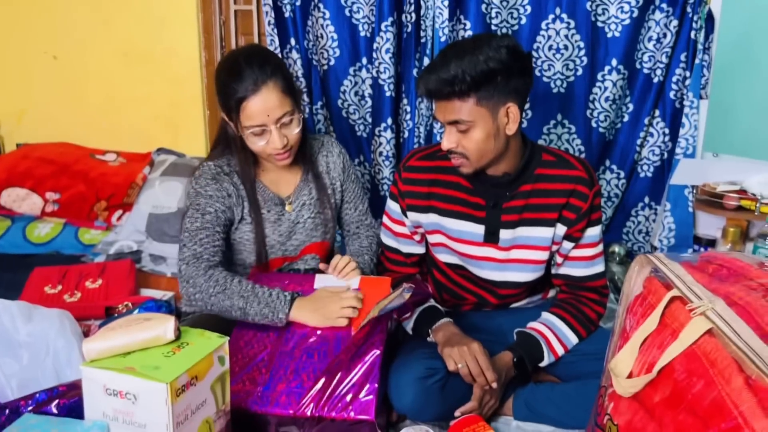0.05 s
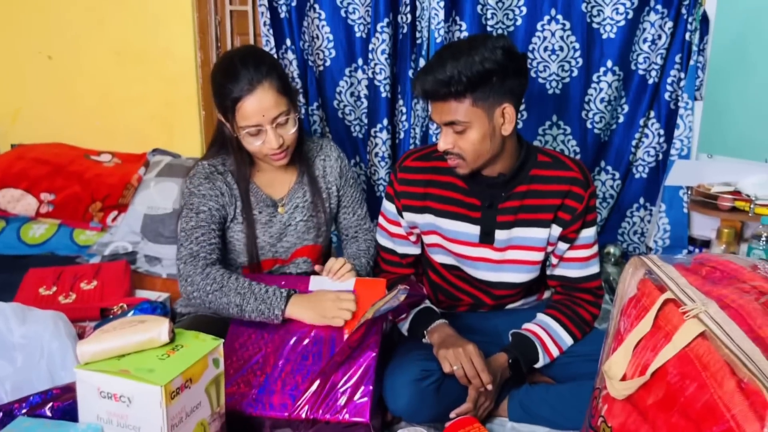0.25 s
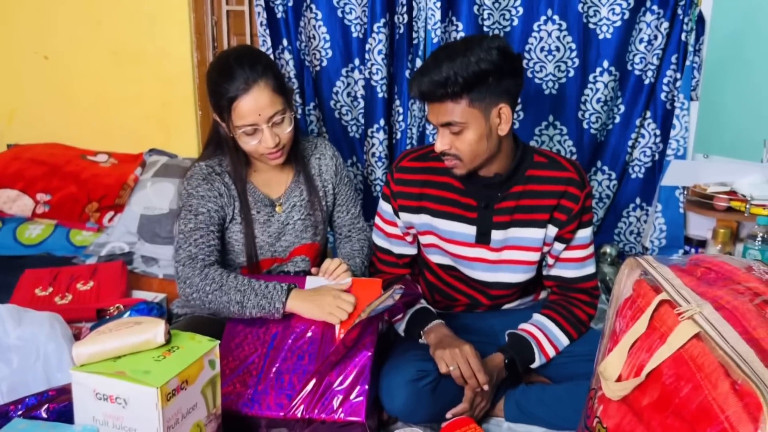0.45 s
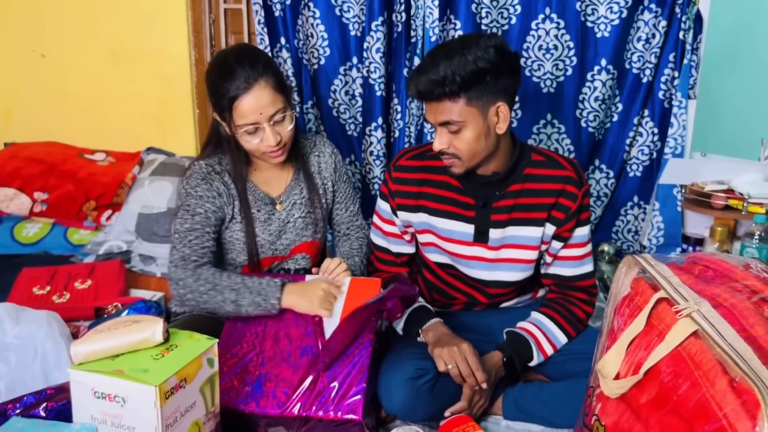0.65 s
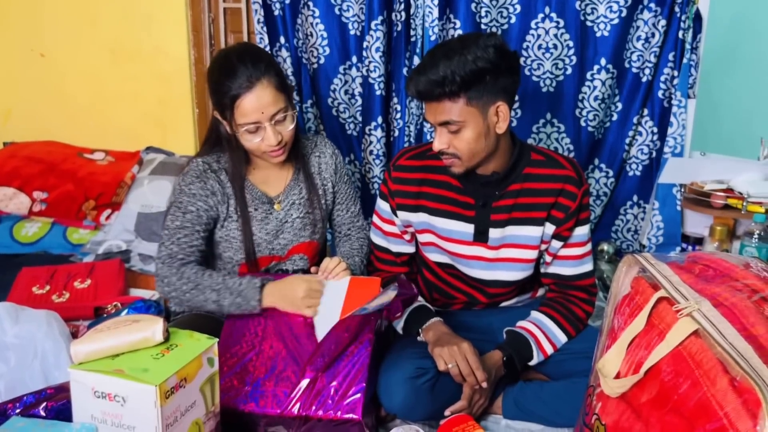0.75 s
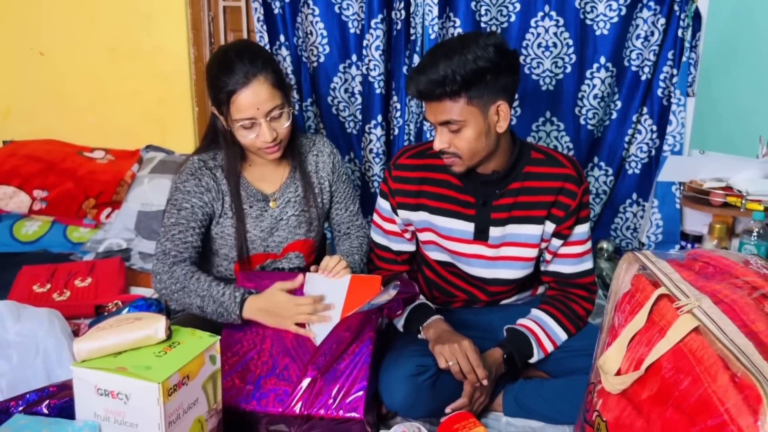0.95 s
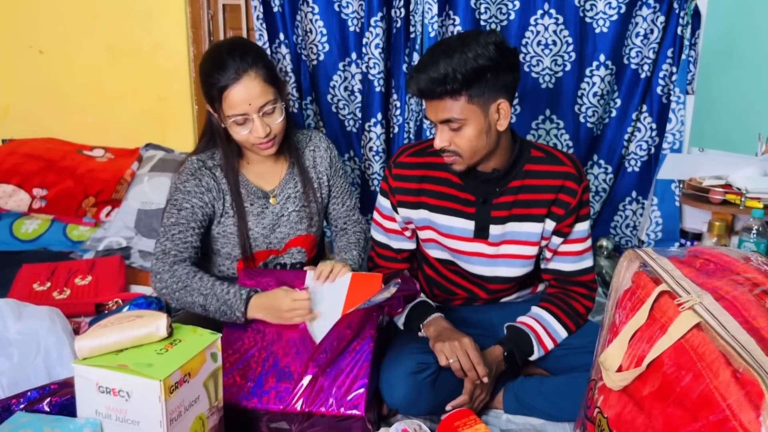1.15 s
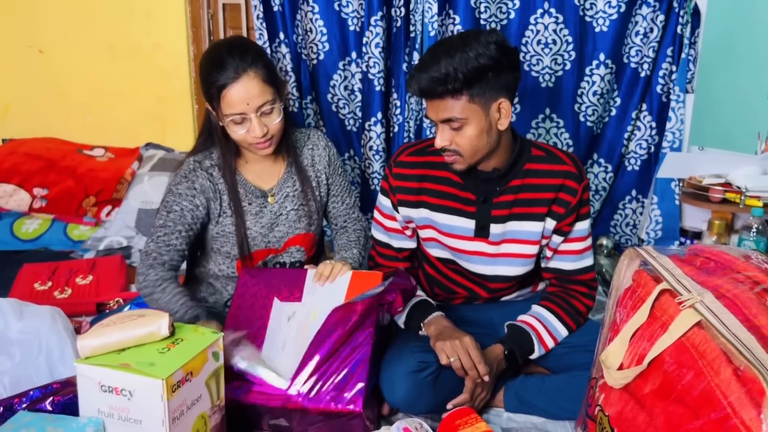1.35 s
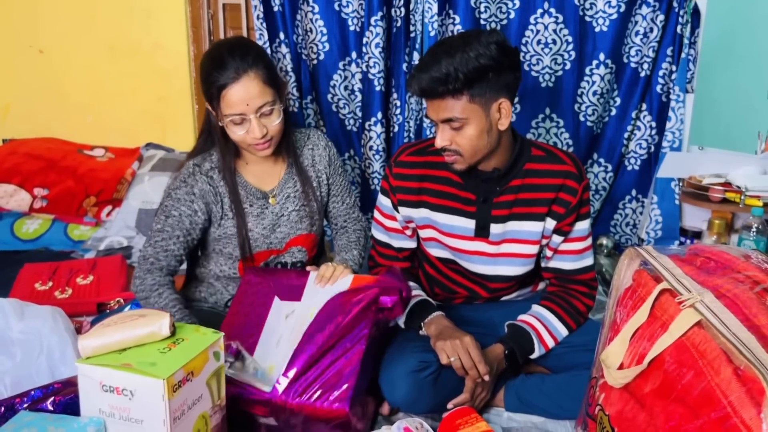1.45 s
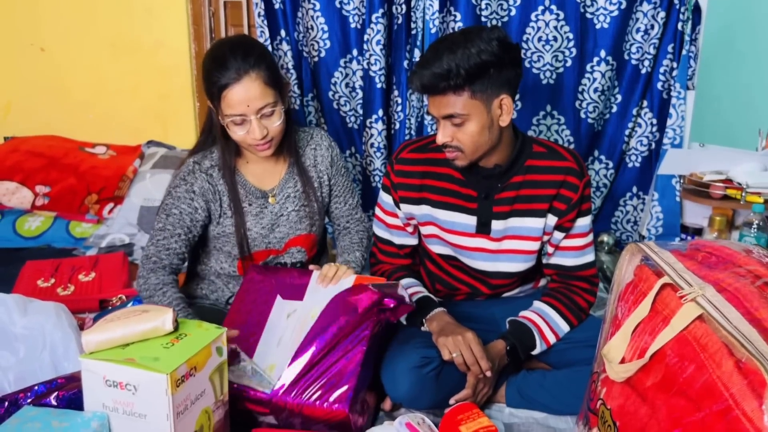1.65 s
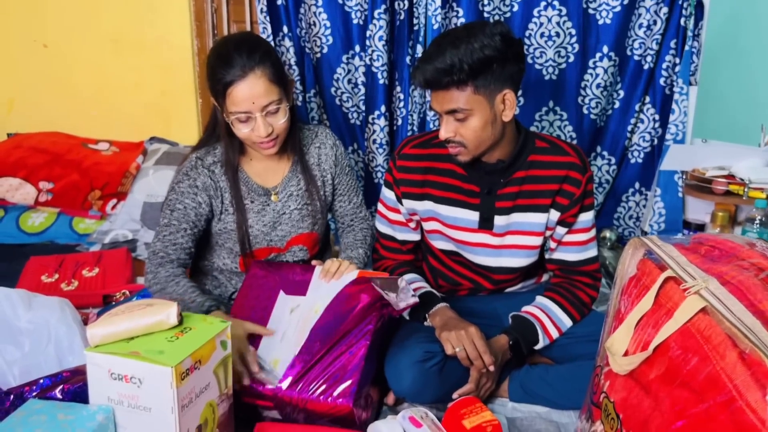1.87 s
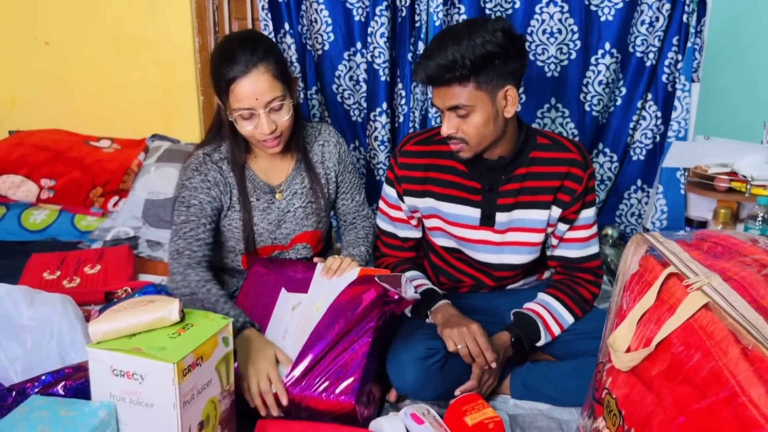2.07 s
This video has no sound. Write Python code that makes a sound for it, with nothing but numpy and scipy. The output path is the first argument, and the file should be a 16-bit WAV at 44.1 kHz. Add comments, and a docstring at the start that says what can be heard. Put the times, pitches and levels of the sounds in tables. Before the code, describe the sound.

Foil wrapping paper crinkles on a cardboard box nearby in a small, slightly echoing room. It starts faintly with a sliding hand, then grows, with a crisp snap and soft box knock at 0.6 seconds and another knock at 1 second. Around 1.25 seconds a taped flap rips loose briefly with sharp cracks, the loudest moment. Lighter crinkling follows, with a hand swishing over the foil near 1.9 seconds.

```python
"""Shiny foil paper crinkles and snaps as a cardboard box is unwrapped a step or two away in a small room.
Tiny creases flip, foil rubs on foil and larger folds buckle. A taped flap rips loose in one short
pull of rapid slips, ringing the taut sheet. A hand slides over the box, which knocks softly as its
walls flex. The room rings on behind every sound."""
import sys
import numpy as np
from scipy import signal
from scipy.fft import rfft, irfft
from scipy.io import wavfile
from scipy.ndimage import uniform_filter1d

SR = 44100
rng = np.random.default_rng(int(sys.argv[2]) if len(sys.argv) > 2 else 0)


def dump(signal):
    """Clip the signal to [-1, 1] and save it as 16-bit WAV at the path in sys.argv[1]."""
    limited = np.clip(np.atleast_2d(signal).T, -1, 1)
    pcm = np.round(limited * 32767).astype(np.int16)
    wavfile.write(sys.argv[1], SR, pcm)


N = 93051
TIME = np.arange(N) / SR

# how hard the foil is worked: (time [s], relative level [dB])
HANDLING = [(0, -62), (.05, -60), (.13, -50), (.22, -46), (.26, -52), (.29, -47), (.34, -49), (.565, -54.5),
            (.59, -44.5), (.638, -40), (.652, -37), (.79, -39.5), (.83, -39), (.93, -37.5), (.98, -47.5),
            (1.02, -42.5), (1.06, -35.5), (1.11, -35), (1.15, -38.5), (1.22, -29), (1.40, -30),
            (1.46, -36.5), (1.64, -45.5), (1.69, -37), (1.77, -36.5), (1.81, -41), (1.85, -39), (1.92, -34),
            (2.11, -34)]
# hand strokes over the package: (start [s], length [s], relative level [dB], tilt [dB/octave])
STROKES = [(0.032, 0.074, -37.5, -2.5), (0.115, 0.088, -44, -5.5), (1.668, 0.028, -43.5, 5.5),
           (1.842, 0.21, -43, 6)]


def from_db(db):
    """Decibels to gain."""
    return 10 ** (np.asarray(db) / 20)


def unit_rms(x):
    """Scale to RMS 1."""
    return x / np.sqrt(np.mean(x ** 2) + 1e-20)


def decay(age_s, t60_s):
    """Gain falling 60 dB in t60_s."""
    return np.exp(-np.log(1000) * age_s / t60_s)


def at_hz(points, hz):
    """Read a table along log frequency."""
    points_hz, values = np.transpose(points)
    return np.interp(np.log(np.maximum(hz, 1)), np.log(points_hz), values)


def colour(x, spectrum, db_per_octave=0, size=4096):
    """Minimum-phase filter of the given spectrum; white noise keeps its level."""
    hz = np.maximum(np.arange(size // 2 + 1) * SR / size, 10)
    gain = unit_rms(from_db(at_hz(spectrum, hz) + db_per_octave * np.log2(hz)))
    cepstrum = irfft(np.log(gain))
    cepstrum[1:size // 2] *= 2
    cepstrum[size // 2 + 1:] = 0
    return signal.fftconvolve(x, irfft(np.exp(rfft(cepstrum))))[:N]


def high_pass(x, hz):
    """Second-order low cut."""
    return signal.sosfilt(signal.butter(2, hz, "high", fs=SR, output="sos"), x + 1e-18)


def resonance(hz, width_hz):
    """Band-pass coefficients, peak gain 1."""
    r = np.exp(-np.pi * width_hz / SR)
    return (1 - r * r) / 2 * np.array([1, 0, -1]), [1, -2 * r * np.cos(2 * np.pi * hz / SR), r * r]


def ring(x, modes):
    """Each mode rings as a dying sine, neighbours in opposite sign."""
    out = 0
    for k, (hz, db, t60_s) in enumerate(modes):
        r, w = decay(1 / SR, t60_s), 2 * np.pi * hz / SR
        mode = signal.lfilter([0, np.sin(w)], [1, -2 * r * np.cos(w), r * r], x + 1e-18)
        out += (-1) ** k * from_db(db) * mode
    return out


def clicks(per_s, spread_db):
    """Random clicks, many small and a few larger; RMS 1."""
    sizes = from_db(spread_db * np.minimum(rng.exponential(1, N), np.pi)) * rng.choice([-1, 1], N)
    return unit_rms(sizes * (rng.random(N) < per_s / SR))


def burst(start_s, length_s):
    """Envelope of a buckling crease: sudden, soon over."""
    return (TIME > start_s) * np.exp(-((TIME - start_s) / length_s) ** 2)


def stroke(start_s, length_s, attack_s=0.01, release_s=0.015):
    """Envelope of a sliding hand: attack, hold, release."""
    age_s = TIME - start_s
    return np.clip(age_s / attack_s, 0, 1) * np.exp(-np.maximum(age_s - length_s, 0) / release_s)


def air():
    """Quiet room air: steady, mostly low noise."""
    # (frequency [Hz], relative density [dB])
    spectrum = [(40, -26), (105, 0), (300, -5), (700, -13), (2000, -21), (6000, -24), (16000, -30)]
    return from_db(-56) * colour(rng.standard_normal(N), spectrum)


def echoes(x, first_echo_s=0.0049):
    """Dense early echoes off near walls, then a longer diffuse tail."""
    # room decay: (frequency [Hz], t60 [s])
    decay_times = [(100, 0.84), (500, 0.38), (2000, 0.72), (5000, 0.7), (10000, 0.68), (16000, 0.6)]
    age_s, hz = TIME[:SR], np.arange(SR // 2 + 1)
    white, tail = rfft(rng.standard_normal(SR)), 0
    edges_hz = np.append(0, np.geomspace(250, SR / 2, 10))
    for low, high in zip(edges_hz, edges_hz[1:]):
        band = irfft(white * ((hz >= low) & (hz < high)), SR)
        tail += band * decay(age_s, at_hz(decay_times, (low + high) / 2))
    early = rng.standard_normal(SR) * decay(age_s, t60_s=0.24)
    onset = np.clip(age_s / first_echo_s - 1, 0, 1)
    response = from_db(-6) * unit_rms(tail * onset) + from_db(1) * unit_rms(early * onset)
    return signal.fftconvolve(x, response / np.sqrt(SR))[:N]


def wandering_echoes(x, spots=5, dwell_s=0.0017):
    """The sound wanders over the sheet, and each spot has its own echoes."""
    shares = rng.standard_normal((spots, N))
    for _ in range(2):
        shares = uniform_filter1d(shares, int(dwell_s * SR), axis=1)
    shares /= np.sqrt(np.sum(shares ** 2, axis=0))
    return sum(echoes(x * share) for share in shares)


def slides():
    """Skin and sleeve drag over the package: a smooth swish, dull on card, brighter on foil."""
    # swish: (frequency [Hz], relative density [dB])
    spectrum = [(60, -15), (120, -13.5), (300, -2.5), (600, -5), (1000, -2.5), (1700, -1.5), (3000, -10),
                (6000, -15), (16000, -66)]
    out = np.zeros(N)
    for start_s, length_s, db, db_per_octave in STROKES:
        friction = from_db(db) * stroke(start_s, length_s) * rng.standard_normal(N)
        out += colour(friction, spectrum, db_per_octave)
    return out


def knocks(contact_s=0.0028, flex_rise_s=0.0097, flex_t60_s=0.11, detune_db_per_octave=7):
    """Each soft push flexes a wall, wakes the box modes near that pitch and rattles the card."""
    # (time [s], relative thud level [dB], wall pitch [Hz], relative rattle level [dB])
    pushes = [(.001, -34, 95, -39), (0.131, -39, 116, -46.5), (0.181, -40, 261, -42.5),
              (0.418, -44.5, 340, -44.5), (0.441, -38.5, 100, -81), (0.642, -24, 175.5, -24.5),
              (0.666, -33, 293, -61), (.89, -42, 193, -54), (1.001, -22, 164.5, -35),
              (1.21, -27.5, 124, -40), (1.272, -27, 272.6, -33), (1.68, -45.5, 167, -51.5),
              (1.878, -43.5, 138, -49.5), (2.003, -44.5, 165, -63)]
    # (frequency [Hz], gain [dB], t60 [s])
    box_modes = [(101.1, -5.5, 0.32), (185.9, -1.5, 0.32), (281, -14, 0.18), (455, 2, 0.36)]
    # rattling card: (frequency [Hz], relative density [dB])
    card_spectrum = [(60, -17.5), (130, -15.5), (290, 3.5), (400, -10), (650, -7.5), (900, -5.5),
                     (1400, -16), (6000, -34)]
    thuds, rattle = np.zeros((2, N))
    for start_s, thud_db, wall_hz, rattle_db in pushes:
        age_s = np.maximum(TIME - start_s, 0)
        force = np.sin(np.pi * np.minimum(age_s / contact_s, 1)) ** 2
        force /= force.sum() + 1e-9
        modes = [(hz, db - detune_db_per_octave * abs(np.log2(hz / wall_hz)), t60_s)
                 for hz, db, t60_s in box_modes]
        swell = np.minimum(age_s / flex_rise_s, 1) * decay(np.maximum(age_s - flex_rise_s, 0), flex_t60_s)
        flex = swell * np.sin(2 * np.pi * wall_hz * age_s)
        thuds += from_db(thud_db) * (flex + ring(force, modes))
        rattle += from_db(rattle_db) * (age_s > 0) * decay(age_s, t60_s=0.26)
    return thuds, colour(rattle * rng.standard_normal(N), card_spectrum)


def taut_sheet(pull):
    """The pull rings the taut foil."""
    # (frequency [Hz], relative gain [dB], t60 [s])
    modes = [(1913, -34, .18), (4516, -44, .17), (4865, -43, .19), (6310, -43, .15), (7105, -46, .15),
             (8298, -44, .17)]
    return ring(pull / 2, modes)


def rip(start_hz=11900, end_hz=2530, glide_s=0.019, width_hz=4800, flap_db=23.5, block=64):
    """Tape lets go in rapid slips; the freed flap lengthens and drops in pitch."""
    # force of the pull: (time [s], relative level [dB])
    pull = [(1.246, -20), (1.251, -10.5), (1.262, -12.5), (1.281, -13.5), (1.296, -24.5), (1.308, -31),
            (1.333, -31)]
    # ripping tape: (frequency [Hz], relative gain [dB])
    spectrum = [(150, -9), (500, 7), (1000, -2), (1800, 1), (4000, -1.5), (7000, -4.5), (10000, -4.5),
                (16000, -5)]
    slips = clicks(per_s=2600, spread_db=3)
    times_s, force_db = np.transpose(pull)
    force = from_db(np.interp(TIME, times_s, force_db)) * (TIME > times_s[0]) * (TIME < times_s[-1])
    flap_hz = end_hz + (start_hz - end_hz) * np.exp(-np.maximum(TIME - times_s[0], 0) / glide_s)
    flap, state = np.zeros(N), np.zeros(2)
    for i in range(0, N, block):
        b, a = resonance(flap_hz[i], width_hz)
        flap[i:i + block], state = signal.lfilter(b, a, slips[i:i + block], zi=state)
    return colour(unit_rms(slips + from_db(flap_db) * flap) * force, spectrum)


def ticks(length_s=0.00075, handling_share=0.81):
    """The finest creases flip under a touch or a sliding hand: very bright ticks."""
    # ticks that stand out: (time [s], relative level [dB])
    accents = [(.063, -40), (.0733, -38), (0.1264, -26.5), (0.5775, -18), (0.8375, -20), (.8441, -17),
               (1.054, -19), (1.1627, -20), (1.633, -22), (1.673, -18), (1.762, -16.5), (1.8628, -26)]
    touch = from_db(-14 + handling_share * np.interp(TIME, *np.transpose(HANDLING)))
    drag = from_db(-45) * sum(stroke(start_s, hold_s) for start_s, hold_s, _, _ in STROKES)
    faint = clicks(per_s=410, spread_db=9) * np.hypot(touch, drag)
    clear = sum(from_db(db) * burst(start_s, length_s) for start_s, db in accents)
    return high_pass(faint + clear * rng.choice([-1, 1], N), hz=7200)


def snaps(fold_db=8, low_cut_ratio=0.34):
    """A larger fold buckles: a brief crack around its own pitch, with little below it."""
    # (time [s], level [dB], length [s], pitch [Hz])
    folds = [(0.3554, -34.5, 0.0028, 5250), (0.358, -39.5, 0.014, 4260), (0.6409, -12, 0.0041, 6280),
             (0.653, -23.5, 0.015, 3330), (0.831, -33, 0.03, 5700), (1.2412, -13, 0.0023, 6160),
             (1.251, -7.5, 0.00094, 12400), (1.2655, -13, 0.0013, 8550), (1.2716, -1.5, 0.0006, 8060),
             (1.2794, -10.5, 0.0023, 6500)]
    out = np.zeros(N)
    for start_s, db, length_s, hz in folds:
        envelope = burst(start_s, length_s)
        crack = envelope * rng.choice([-1, 1], N) + 1e-18
        fold = signal.lfilter(*resonance(hz, width_hz=2500), crack)
        snap = high_pass(crack + from_db(fold_db) * fold, low_cut_ratio * hz)
        out += from_db(db) * unit_rms(snap) * np.sqrt(np.mean(envelope ** 2))
    return out


def facets(x, count=110, low_hz=2840, high_hz=9750, half_span_s=0.019):
    """Flat patches between creases form and collapse; each briefly lends the crackle its pitch."""
    out = x.copy()
    for when, pitch in rng.random((count, 2)):
        hz = low_hz * (high_hz / low_hz) ** pitch
        life = np.maximum(1 - ((TIME - when * TIME[-1]) / half_span_s) ** 2, 0)
        out += from_db(0.5) * signal.lfilter(*resonance(hz, width_hz=200), x * life + 1e-18)
    return out * np.std(x) / np.std(out)


def crinkle(crease_s=0.00094, friction_db=-4.5):
    """Tiny creases flip, each a very short crack, over the hiss of foil rubbing on foil."""
    # foil: (frequency [Hz], relative gain [dB])
    spectrum = [(150, -9.5), (400, 0), (1000, -7), (2200, -3), (3600, -2), (5000, 1), (7000, 1.5),
                (9000, -5), (12000, -5.5), (16000, -9.5)]
    flips = clicks(per_s=820, spread_db=1.5)
    power = signal.lfilter([1], [1, -np.exp(-2 / (crease_s * SR))], flips ** 2 + 1e-18)
    cracks = unit_rms(np.sqrt(power) * rng.standard_normal(N))
    texture = unit_rms(cracks + from_db(friction_db) * rng.standard_normal(N))
    effort = from_db(np.interp(TIME, *np.transpose(HANDLING)))
    return colour(facets(texture) * effort, spectrum)


def scene():
    """Foil, tape, hand and box with their echoes, over quiet air; mono."""
    thuds, rattle = knocks()
    pull = rip()
    paper = from_db(-5.5) * (crinkle() + ticks() + pull) + snaps()
    rustle = from_db(-4) * (slides() + rattle)
    reverb = wandering_echoes(paper) + echoes(rustle + from_db(-6.5) * thuds)
    return (paper + taut_sheet(pull) + rustle + thuds + reverb + air())[None]


def record(dry, low_cut_hz=71, high_cut_hz=15850):
    """The microphone sheds deep bass, peaks are rounded, the top is cut."""
    thin = high_pass(dry, low_cut_hz)
    rounded = 1.155 * np.tanh(thin / 1.247)
    return signal.sosfilt(signal.ellip(12, .2, 80, high_cut_hz, fs=SR, output="sos"), rounded)


dry = scene()
out = record(dry)
dump(out)
```